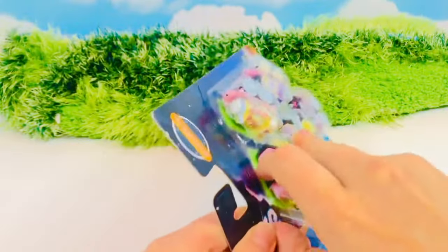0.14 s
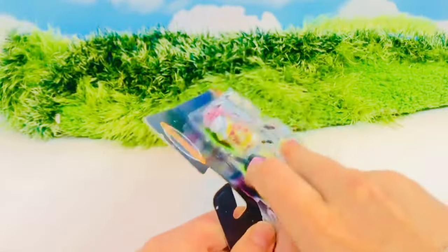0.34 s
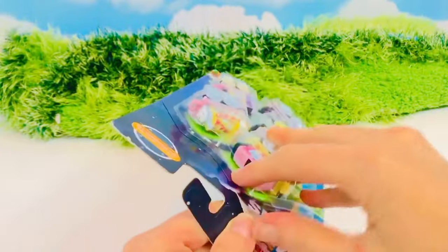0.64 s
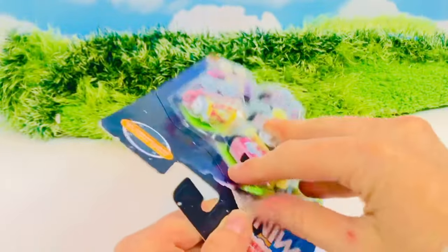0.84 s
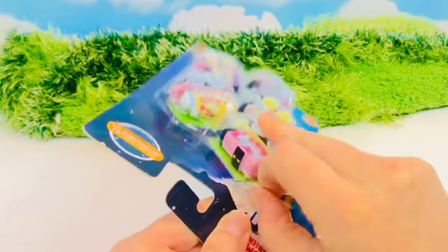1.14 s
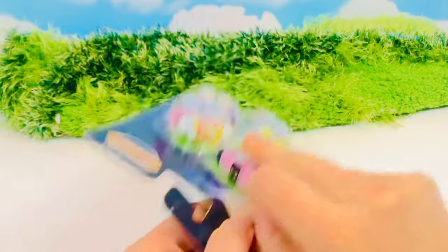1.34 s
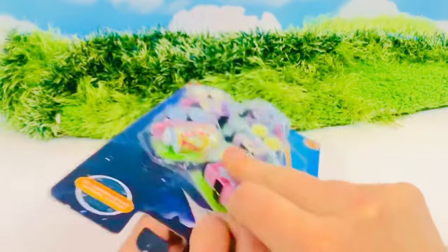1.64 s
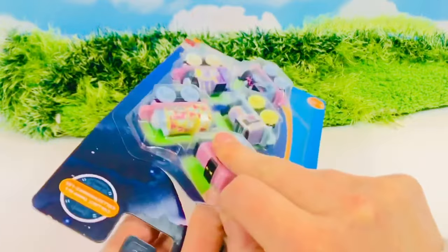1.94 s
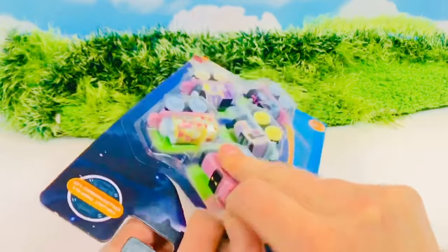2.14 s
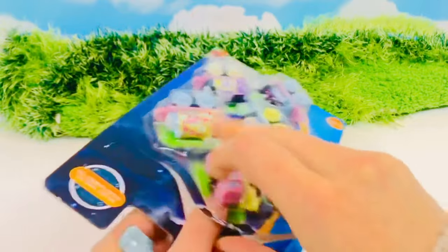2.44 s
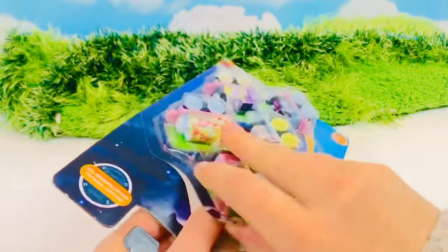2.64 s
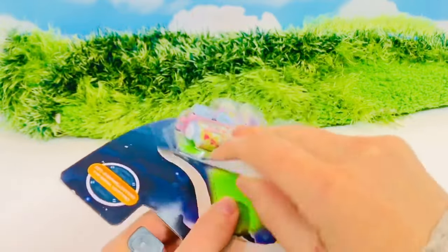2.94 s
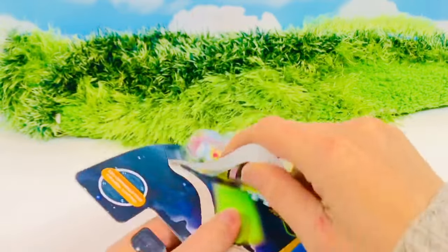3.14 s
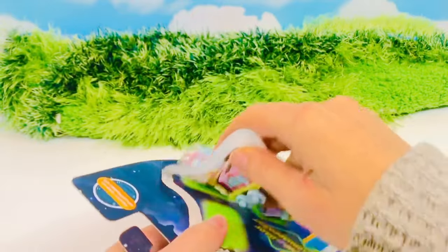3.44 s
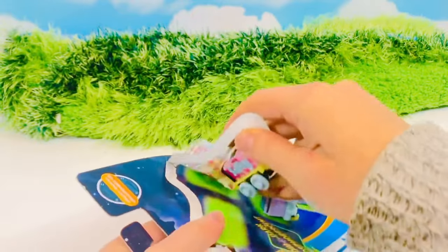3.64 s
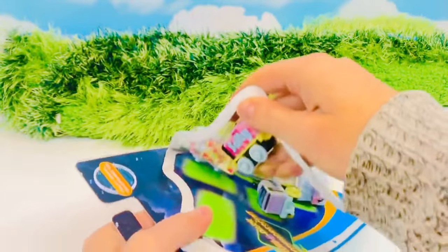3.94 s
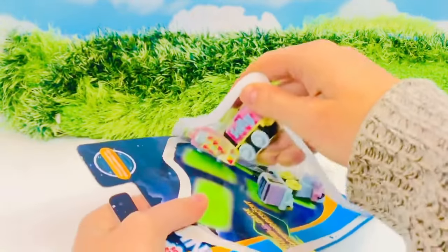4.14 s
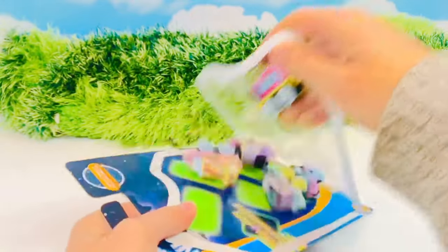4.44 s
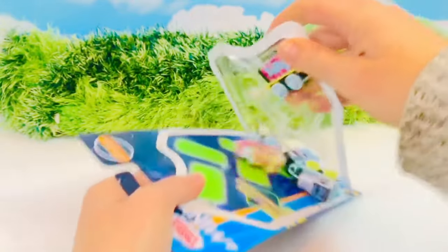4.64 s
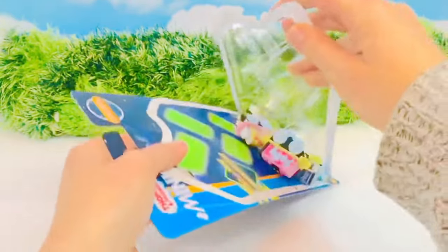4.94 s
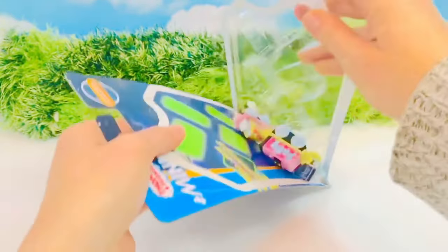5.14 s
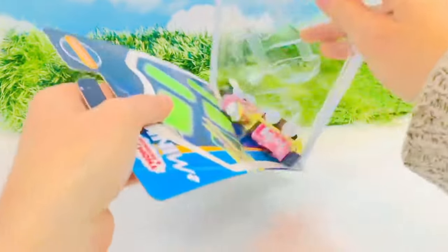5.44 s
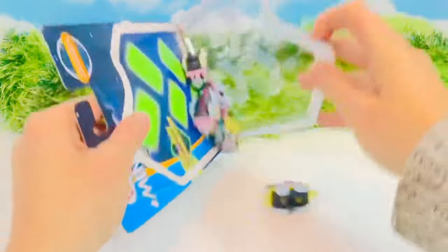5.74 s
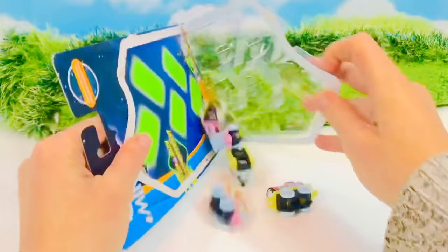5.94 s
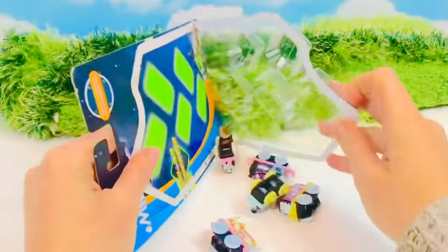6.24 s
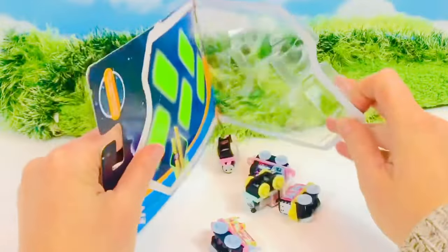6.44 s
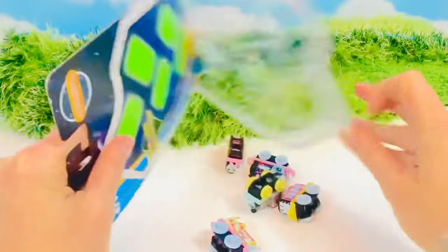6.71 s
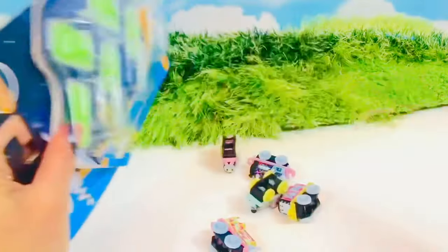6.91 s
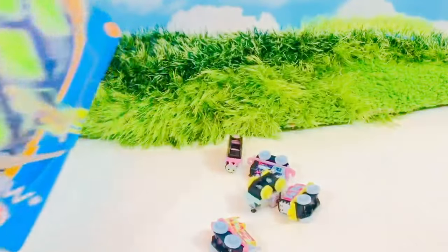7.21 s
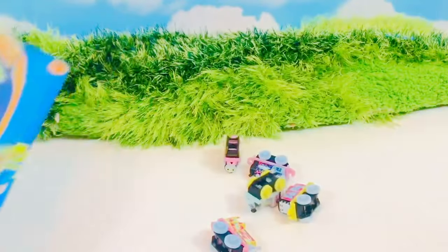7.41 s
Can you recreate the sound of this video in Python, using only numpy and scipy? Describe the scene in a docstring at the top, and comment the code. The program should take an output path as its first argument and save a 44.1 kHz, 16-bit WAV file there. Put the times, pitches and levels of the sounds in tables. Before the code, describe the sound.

Close-up plastic peeling: crinkles, one explosive early snap, a quick tearing burst, rattling little toys, and a final hollow pop of the empty shell.

```python
"""Fine crackle and sharp plastic snaps, close to the microphone: a blister shell is peeled off its card.
The glue seam rips in tiny slips, the shell buckles, small toys skid out and clatter onto the table,
and the empty shell springs back against the card. Each blow is a noise burst or damped resonances;
rubbing is a train of random clicks through the spectrum of what it touches.
The table top adds an early echo, the small damped room a short tail, and faint hiss and rumble lie below."""
import sys
import numpy as np
from scipy import signal
from scipy.fft import rfft, irfft
from scipy.io import wavfile
from scipy.ndimage import uniform_filter1d

SR = 44100
rng = np.random.default_rng(int(sys.argv[2]) if len(sys.argv) > 2 else 0)


def wav_out(sig):
    """Save sig, one row per channel (or a flat mono array), as 16-bit PCM at SR to the path in sys.argv[1]."""
    wavfile.write(sys.argv[1], SR, np.round(np.clip(np.atleast_2d(sig).T, -1, 1) * 32767).astype(np.int16))


N = 333967
TIME = np.arange(N) / SR
HIT_TIME = TIME[:SR // 8]
STROKE_TIME = TIME[:SR // 2]

# Levels in the event and resonance tables are relative; each source sets its own trim.
# pulls on the glue seam, each building until the glue gives:
# [start t/s, length t/s, crackle level/dB, shell level/dB]
PULLS = [(0.18, 0.082, -53, -68), (0.268, 0.035, -42.5, -76), (0.336, 0.027, -31, -43),
         (0.381, 0.0054, -15, -25.5), (0.85, 0.051, -45.5, -78), (0.972, 0.013, -43.5, -46.5),
         (1.05, 0.13, -45.5, -77), (1.26, 0.11, -41, -51.5), (1.41, 0.3, -31, -47), (1.76, 0.066, -42, -42),
         (1.86, 0.036, -44, -43), (2.163, 0.047, -29, -46.5), (2.405, 0.031, -48, -40),
         (2.6, 0.053, -35.5, -62), (2.732, 0.05, -33, -51.5), (2.83, .12, -36, -54),
         (3.0, 0.16, -34.5, -49), (3.18, 0.1, -38.5, -59), (3.3, 0.082, -40, -52.5), (3.65, 0.18, -36, -49),
         (3.865, 0.027, -42, -43.5), (3.97, 0.066, -50, -58), (4.048, 0.032, -33, -42.5),
         (6.69, .04, -38, -49)]
# the last length of seam giving way in a few jerks:
# [start t/s, length t/s, crackle level/dB, shell level/dB]
JERKS = [(4.31, 0.032, -41.5, -51.5), (4.341, 0.027, -29.5, -38), (4.373, 0.0071, -18, -27.5),
         (4.399, 0.047, -22.5, -27.5), (4.453, .038, -29.5, -27), (4.51, 0.052, -38, -36.5)]
# sharp snaps: the shell buckling or slapping the card, or the glue letting go at once: # [t/s, crack level/dB,
# crack length t/s, shell level/dB, thump level/dB, strongest ring f/Hz]
SNAPS = [(0.3887, 8, 0.0044, -15, -49, 680), (1.735, -17.5, 0.0032, -55, -55, 540),
         (1.81, -30, .007, -42, -43, 850), (2.18, -20.5, .012, -46, -50, 577),
         (2.391, -16, 0.014, -52, -62, 610), (2.453, -16.5, 0.0067, -43.5, -47, 625),
         (2.727, -19, 0.01, -60, -73, 1100), (3.1315, -20, 0.012, -34, -70, 1100),
         (3.1418, -16.5, 0.021, -28, -39.5, 1080), (3.284, -16, 0.0098, -44.5, -44.5, 880),
         (3.398, 3.5, .0044, -17.5, -36, 1460), (3.4453, -3, .013, -22, -26.5, 960),
         (3.497, -13, 0.0096, -48, -59, 1100), (3.8862, -15, 0.0039, -39, -47, 1390),
         (4.131, -20, 0.003, -48.5, -55, 1400), (4.378, -4, 0.012, -33, -42, 1030),
         (4.4365, 0.5, 0.01, -42, -33.5, 1130), (4.475, -3, 0.015, -22.5, -50, 1140),
         (6.7915, -5.5, .004, -16, -28.5, 860), (6.9205, -26.5, .005, -41.5, -47, 1300)]
# toys knocking on the pack, the table and each other:
# [t/s, click level/dB, body level/dB, thump level/dB, strongest ring f/Hz]
KNOCKS = [(4.649, -19, -37, -53, 1000), (4.681, -5.5, -36, -47, 1130), (4.82, 1.5, -19.5, -46, 950),
          (4.8334, -2.5, -26, -42.5, 990), (4.8817, 1, -33, -52, 1030), (4.896, -3.5, -41, -58, 960),
          (4.9346, -15, -35, -50, 637), (5.469, -19.5, -39, -67, 1010), (5.481, -23, -41, -75, 1020),
          (5.5817, -22.5, -40.5, -43, 1120), (5.6135, 6, -16.5, -24.5, 665), (5.6779, 3.5, -32, -33, 616),
          (5.7339, 1.5, -31, -36.5, 630), (5.7674, -4.5, -33.5, -44, 785), (5.8101, 1, -18.5, -37, 677),
          (5.816, 5, -30, -48, 1600), (5.826, 3, -22.5, -31, 1220), (5.8533, 4, -28, -42, 1110),
          (5.872, -5, -20, -29.5, 980), (5.914, 5.5, -21, -38, 634), (5.9631, 4.5, -24.5, -37.5, 1050),
          (6.0083, -4.5, -26.5, -32, 664), (6.0297, -3.5, -18, -55, 1170), (6.061, -7, -30.5, -53, 715),
          (6.0803, -10.5, -25.5, -39.5, 711), (6.13, -16, -27, -44, 662), (6.1491, -3, -44, -45, 659)]
# toys skidding over the card: [start t/s, length t/s, hiss level/dB, card level/dB]
SLIDES = [(4.58, 0.12, -43, -45), (4.645, 0.02, -39, -34), (4.72, 0.1, -46, -43),
          (4.825, 0.026, -36, -31.5), (4.9, 0.027, -39.5, -39.5), (5.055, 0.028, -50.5, -57.5),
          (5.27, 0.042, -55, -51.5), (5.395, 0.13, -55, -49), (5.69, 0.12, -35, -38.5),
          (5.815, 0.1, -36.5, -29), (5.955, 0.035, -26.5, -32), (6.035, 0.11, -32.5, -38),
          (6.22, 0.073, -60, -54.5), (6.32, 0.15, -56, -62.5)]
# dull taps and creaks of the pack in the fingers: [t/s, level/dB, strongest ring f/Hz]
TAPS = [(0.626, -33.5, 1150), (1.577, -28, 597), (1.623, -25.5, 630), (1.689, -33, 570),
        (3.0853, -24.5, 910), (3.973, -26.5, 770), (4.157, -26, 880), (4.254, -32.5, 1370),
        (5.324, -33.5, 630), (6.737, -20, 584), (7.125, -42, 690), (7.277, -38.5, 662)]
# fingers shifting their grip on the film: [start t/s, end t/s, level/dB]
GRIPS = [(0.0, .33, -34.5), (1.248, 1.95, -31.5), (2.248, 4.247, -31.5), (6.527, 6.68, -30.5)]

# resonances of the shell on its card: [f/Hz, width f/Hz, level/dB]
SHELL_MODES = [(540, 10, -10), (662, 14, 3), (722, 11, 1.5), (933, 8.9, 1), (1030, 25, -1.5),
               (1158, 24, -1), (1290, 18, -7), (1470, 25, -5), (1600, 12, -17), (2060, 68, -12),
               (2094, 65, -14.5), (2440, 75, -15), (2860, 70, -12), (3067, 110, -19.5)]
# resonances of the empty shell once peeled free: [f/Hz, width f/Hz, level/dB]
EMPTY_SHELL_MODES = [(570, 20, -2), (770, 30, -3), (860, 25, 0.5), (1018, 25, -3.5), (1090, 25, -8),
                     (1170, 14, 1.5), (1330, 18, -6.5), (1550, 12, -2.5), (1600, 10, -5), (1728, 14, -8.5),
                     (1970, 20, -9.5), (2350, 50, -15), (2950, 50, -14)]
# resonances of toys knocking on the card: [f/Hz, width f/Hz, level/dB]
TOY_MODES = [(460, 200, -20), (674, 6.5, 2.5), (770, 160, 0), (1005, 67, 2), (1154, 80, -15),
             (1220, 17, -0.5), (1390, 110, -8.5), (1660, 34, -4), (1844, 110, -2), (2416, 96, -8.5),
             (2870, 15, -17), (3450, 140, -23)]
# resonances of the card: [f/Hz, width f/Hz, level/dB]
CARD_MODES = [(85.6, 56, -16), (127, 40, -10), (170, 50, 1.5), (302, 66, 2), (413, 34, 3), (572, 42, 7.5)]
# resonances of the table top: [f/Hz, width f/Hz, level/dB]
TABLE_MODES = [(135, 10, -9), (170.5, 11, 5), (220, 110, -20), (306, 15, 0.5), (380, 22, 1.5),
               (532, 21, -8.5)]

# Only the shape of these spectra counts.
# ripping glue and fibres: [f/Hz, level/dB per Hz]
RIP_SPECTRUM = [(2000, -17), (3000, -14), (4400, -13), (6000, -9), (7400, -4), (9500, -3), (11500, -2),
                (13000, 2), (14500, 5), (15800, 4)]
# shell flexing behind the pulls: [f/Hz, level/dB per Hz]
FLEX_SPECTRUM = [(150, -11.5), (250, -35), (330, -10), (500, -4), (650, -2.5), (850, -5), (1100, -4),
                 (1600, -14), (2400, -20), (4000, -28.5), (9000, -73.5)]
# freed shell radiating the tear: [f/Hz, level/dB per Hz]
SEAM_SPECTRUM = [(110, -28), (170, -12.5), (250, -26), (330, -15.5), (470, -5.5), (780, -11), (970, 2),
                 (1140, -2.5), (1460, -6), (2000, -12), (2800, -16), (4000, -20), (9000, -50)]
# crack of the buckling shell: [f/Hz, level/dB per Hz]
CRACK_SPECTRUM = [(1500, -13), (2200, -12), (3200, -9.5), (4500, -12), (5800, -5.5), (9000, -5.5),
                  (11000, -1), (13000, -1), (15800, -7)]
# click of a hard toy: [f/Hz, level/dB per Hz]
CLICK_SPECTRUM = [(1700, -15), (2900, -12), (3300, -11), (4500, -14), (5800, -11), (7000, -5), (7600, -6),
                  (8300, -1), (9000, -5), (9700, -3), (11500, -6), (13000, -4), (14500, -3), (15800, -3)]
# card rubbed by sliding toys: [f/Hz, level/dB per Hz]
RUB_SPECTRUM = [(150, -76), (250, -47), (471, -8.5), (523, 1), (768, -3.5), (976, 6.5), (1330, -2),
                (1560, -6), (1900, -15.5), (2700, -18), (3000, -21), (3900, -44), (6600, -120)]
# background hiss and rumble: [f/Hz, level/dB per Hz]
FLOOR_SPECTRUM = [(12, -37), (20, 2.5), (79, -2), (168, 0), (328, -3.5), (499, -4), (642, -3.5),
                  (825, -9.5), (1150, -8.5), (1710, -14.5), (4540, -19), (14300, -17), (16000, -35.5)]
# room decay by 60 dB: [f/Hz, t/s]
ROOM_T60 = [(150, .28), (700, .27), (1500, .28), (4000, .24), (9000, .22), (15000, .19)]
# room against the direct sound: [f/Hz, level/dB]
ROOM_LEVEL = [(150, 1.5), (700, -3.5), (1500, -1), (4000, 0), (9000, -5.5), (15000, -6)]

SHELL_FREE_S = 6.3
# extra width of the resonances in a snap, on the card and once free
HELD_DAMPING_HZ, FREE_DAMPING_HZ = 75, 45
FLAP_FROM_S, FLAP_TO_S = 3.885, 4.35
FLAP_HZ, FLAP_WIDTH_HZ, FLAP_DB = 1400, 40, -63
FLOOR_DB, CUTOFF_HZ = -58, 15800


def peeling(trim_db=-2):
    """Glue and paper fibres let go a few at a time."""
    fibres = slips(per_s=1500, spread_db=0.5, clump_db=2.0, clump_per_s=200)
    pull = stroke_gains(PULLS, attack_s=0.011, swell_db_per_s=53, release_s=0.013)
    return from_db(trim_db) * friction(pull, fibres, RIP_SPECTRUM, FLEX_SPECTRUM)


def tearing():
    """The seam runs: dense slips in quick jerks, and the freed shell radiates them."""
    fibres = slips(per_s=4000, spread_db=3.3, clump_db=3, clump_per_s=260)
    jerk = stroke_gains(JERKS, attack_s=0.0035, swell_db_per_s=30, release_s=0.013)
    return friction(jerk, fibres, RIP_SPECTRUM, SEAM_SPECTRUM)


def shell_snaps(crack_trim_db=3, shell_trim_db=27, thump_trim_db=24, brighten_db=2.5):
    """The shell flips through a buckle or the glue lets go at once: a crack, a hollow ring and a card thump;
    higher rings are brighter."""
    out = np.zeros(N)
    for s, crack_db, length_s, shell_db, thump_db, hz in SNAPS:
        modes, damping_hz = SHELL_MODES, HELD_DAMPING_HZ
        if s >= SHELL_FREE_S:
            modes, damping_hz = EMPTY_SHELL_MODES, FREE_DAMPING_HZ
        tilt_db = 1.1 + brighten_db * np.log2(hz / 1000)
        snap = crack(CRACK_SPECTRUM, length_s)
        hollow = ring(modes, damping_hz, low_cut_hz=710, focus_hz=hz, focus_db=5.5, tilt_db=tilt_db)
        thump = ring(CARD_MODES, damping_hz=18, low_cut_hz=72)
        add(out, s, from_db(crack_db + crack_trim_db) * snap)
        add(out, s, from_db(shell_db + shell_trim_db) * hollow)
        add(out, s, from_db(thump_db + thump_trim_db) * thump)
    return out


def toy_knocks(click_trim_db=4, body_trim_db=27, thump_trim_db=26):
    """Hard little toys land: a bright click, a short knock and the boom of the table top."""
    out = np.zeros(N)
    for s, click_db, body_db, thump_db, hz in KNOCKS:
        click = crack(CLICK_SPECTRUM, length_s=0.0064)
        body = ring(TOY_MODES, damping_hz=48.3, low_cut_hz=480, focus_hz=hz, focus_db=12, scatter_db=6.5)
        boom = ring(TABLE_MODES, damping_hz=9.9, low_cut_hz=210, scatter_db=0.5)
        add(out, s, from_db(click_db + click_trim_db) * click)
        add(out, s, from_db(body_db + body_trim_db) * body)
        add(out, s, from_db(thump_db + thump_trim_db) * boom)
    return out


def sliding(trim_db=-0.5):
    """Toys skid and chatter down the tilted card."""
    chatter = slips(per_s=900, spread_db=-3.5, clump_db=3.0, clump_per_s=270)
    skid = stroke_gains(SLIDES, attack_s=0.007, swell_db_per_s=37.5, release_s=0.022)
    return from_db(trim_db) * friction(skid, chatter, CLICK_SPECTRUM, RUB_SPECTRUM)


def finger_taps(trim_db=11):
    """Soft fingertips wake mostly the shell modes near one pitch, without a crack."""
    out = np.zeros(N)
    for s, db, hz in TAPS:
        tap = ring(SHELL_MODES, damping_hz=60, low_cut_hz=170, focus_hz=hz, focus_db=10, scatter_db=0.3)
        add(out, s, from_db(db + trim_db) * tap)
    return out


def crinkling(ticks_per_s=18, spread_db=4, tick_trim_db=2, creak_trim_db=-2, rub_trim_db=-24):
    """Fingers rub the film, and small dents pop in and out, each a tick with a short creak of the shell."""
    out, rub = np.zeros((2, N))
    for start_s, end_s, db in GRIPS:
        rub += from_db(db + rub_trim_db) * ((TIME > start_s) & (TIME < end_s))
        slots = np.arange(start_s, end_s, 1 / ticks_per_s)
        chances = rng.random((len(slots), 4))
        for s, (late, tick_chance, creak_chance, pitch) in zip(slots, chances):
            tick_db = tick_trim_db + spread_db * (2 * tick_chance + 0.5)
            creak_db = creak_trim_db + spread_db * 2 * creak_chance
            tick = crack(RIP_SPECTRUM, length_s=0.003)
            creak_hz = 560 * 2 ** pitch  # anywhere within one octave
            creak = ring(SHELL_MODES, damping_hz=60, low_cut_hz=350, focus_hz=creak_hz, focus_db=12)
            pop = from_db(tick_db) * tick + from_db(creak_db) * creak
            add(out, s + late / ticks_per_s, from_db(db) * pop)
    film = slips(per_s=2300, spread_db=1, clump_db=15, clump_per_s=40)
    return out + through(rub * film, response(RIP_SPECTRUM))


def flap():
    """Faint slips at the hinge keep one mode of the lifted flap ringing while it is bent back."""
    bent = (TIME > FLAP_FROM_S) & (TIME < FLAP_TO_S)
    decay = np.exp(-np.pi * FLAP_WIDTH_HZ * HIT_TIME)
    mode = unit_energy(decay * np.sin(2 * np.pi * FLAP_HZ * HIT_TIME))
    hinge = slips(per_s=300, spread_db=2, clump_db=3, clump_per_s=60)
    return from_db(FLAP_DB) * through(bent * hinge, mode)


def blows():
    """All snaps, taps and knocks radiated in one direction, each call with its own fine detail."""
    return shell_snaps() + finger_taps() + toy_knocks()


def table_echo(direct, echo_db=-8, delay_s=0.003648):
    """The table top throws the sound back; the hands shade off its treble."""
    shaded = uniform_filter1d(direct, size=8)
    return from_db(echo_db) * np.interp(TIME - delay_s, TIME, shaded, left=0)


def room_tail(gap_s=0.00059):
    """Diffuse reverberation of one click: noise bands with their own decay; the treble dies first."""
    t = STROKE_TIME
    edges = np.geomspace(60, 18000, num=13)
    noises = rng.standard_normal((2, len(t)))  # alternate, so neighbouring bands differ
    onset = np.clip(t / gap_s - 0.5, 0, 1)
    tail = np.zeros(len(t))
    for k, (low, high) in enumerate(zip(edges, edges[1:])):
        hz = np.sqrt(low * high)
        band_pass = signal.butter(2, [low, high], "band", fs=SR, output="sos")
        band = signal.sosfilt(band_pass, noises[k % 2])
        fade = onset * np.exp(-np.log(1000) * t / at_hz(ROOM_T60, hz))
        share = np.sqrt(2 * (high - low) / SR)  # the band's part of a click's flat spectrum
        tail += unit_energy(band * fade) * share * from_db(at_hz(ROOM_LEVEL, hz))
    return tail


def room_sound(rubbing, sides=4):
    """The room hears the pack from several sides, each with its own blows and its own tail."""
    heard = sum(through(blows() + rubbing, room_tail()) for side in range(sides))
    return heard / np.sqrt(sides)


def noise_floor():
    """Steady faint hiss and rumble: noise shaped by a spectrum."""
    return from_db(FLOOR_DB) * through(rng.standard_normal(N), response(FLOOR_SPECTRUM))


def friction(gains, clicks, bright, hollow, facets=10, touch_s=0.004):
    """Slips crackle on one random facet after another and shake the body behind them."""
    crackle, body = gains
    touched = rng.integers(0, facets, N)[(TIME / touch_s).astype(int)]
    fizz = np.zeros(N)
    for k in range(facets):
        fizz += through(clicks * crackle * (touched == k), response(bright, uneven_db=3.5))
    return fizz + through(clicks * body, response(hollow))


def slips(per_s, spread_db, clump_db, clump_per_s):
    """Stick-slip clicks of random size and sign, louder and softer in clumps; local rms held near one."""
    size_db = spread_db * np.minimum(rng.exponential(1, N), 4) + clump_db * drift(clump_per_s)
    slipping = rng.random(N) < per_s / SR
    clicks = from_db(size_db) * rng.choice([-1, 1], N) * slipping
    power = np.abs(uniform_filter1d(clicks ** 2, size=1500))
    return clicks / np.sqrt(power + 1e-9)


def stroke_gains(strokes, attack_s, swell_db_per_s, release_s):
    """Each stroke catches quickly, swells as force builds and dies on letting go; gains of crackle and body."""
    gains = np.zeros((2, N))
    for start_s, length_s, *levels in strokes:
        since_end = STROKE_TIME - length_s
        attack = np.minimum(STROKE_TIME / attack_s, 1)
        swell = from_db(swell_db_per_s * np.minimum(since_end, 0))
        release = np.exp(-np.maximum(since_end, 0) / release_s)
        for gain, db in zip(gains, levels):
            add(gain, start_s, from_db(db) * attack * swell * release)
    return gains


def crack(spectrum, length_s, edge=0.18, edge_s=0.00043):
    """A hard leading edge, then a run of tiny impacts on one facet that stops within milliseconds."""
    envelope = edge * np.exp(-HIT_TIME / edge_s) + np.exp(-(HIT_TIME / length_s) ** 2)
    impacts = rng.standard_normal(len(HIT_TIME)) * envelope
    return unit_energy(through(impacts, response(spectrum, uneven_db=1.2)))


def ring(modes, damping_hz, low_cut_hz, focus_hz=1000, focus_db=0, tilt_db=0, scatter_db=1.0):
    """One blow: contact favours modes near focus_hz, tilt_db per octave the high ones; damping widens all."""
    hz, width_hz, db = np.transpose(modes)[:, :, None]
    nearness = np.exp(-(4 * np.log(hz / focus_hz)) ** 2)
    scatter = scatter_db * rng.standard_normal(hz.shape)
    db = db + focus_db * nearness + tilt_db * np.log2(hz / focus_hz) + scatter
    width_hz = width_hz + damping_hz
    strength = from_db(db) * np.sqrt(width_hz) * rng.choice([-1, 1], hz.shape)
    # bending waves take up to a millisecond to cross the sheet
    age = np.maximum(HIT_TIME - 0.001005 * rng.random(hz.shape), 0)
    decay = np.exp(-np.pi * width_hz * age)
    rings = np.sum(strength * decay * np.sin(2 * np.pi * hz * age), axis=0)
    # the contact bounces once, a few milliseconds later
    bounce_s = rng.uniform(0.001902, 0.005214)
    rings = rings + 0.33 * np.interp(HIT_TIME - bounce_s, HIT_TIME, rings, left=0)
    low_cut = signal.butter(2, low_cut_hz, "high", fs=SR, output="sos")
    return unit_energy(signal.sosfilt(low_cut, rings))


def response(spectrum, uneven_db=0, size=4096):
    """Causal impulse response of a spectrum; uneven_db adds the chance peaks and dips of one small facet."""
    hz = np.maximum(np.arange(size // 2 + 1) * SR / size, 1)
    facet_hz = np.arange(0, SR / 2, 700)
    facet = np.interp(hz, facet_hz, rng.standard_normal(len(facet_hz)))
    low_fall = np.minimum(hz / spectrum[0][0], 1) ** 2  # below the first point
    gain = from_db(at_hz(spectrum, hz) + uneven_db * facet) * low_fall
    cepstrum = irfft(np.log(gain + 1e-6))
    cepstrum[1:size // 2] *= 2  # folding the cepstrum gives minimum phase
    cepstrum[size // 2 + 1:] = 0
    return unit_energy(irfft(np.exp(rfft(cepstrum))))


def through(x, impulse):
    """Pass a sound through an impulse response."""
    return signal.oaconvolve(x, impulse)[:len(x)]


def drift(per_s):
    """Random values per_s times a second, joined by straight lines, with an rms of one."""
    return rms_one(np.interp(TIME * per_s, np.arange(N), rng.standard_normal(N)))


def at_hz(points, hz):
    """Read a table along a log-frequency axis."""
    freqs, values = np.transpose(points)
    return np.interp(np.log(np.maximum(hz, 1)), np.log(freqs), values)


def add(out, s, sound):
    """Mix a sound in at time s."""
    start = max(round(s * SR), 0)
    out[start:start + len(sound)] += sound[:N - start]


def from_db(db):
    """Decibels to gain."""
    return 10 ** (np.asarray(db) / 20)


def unit_energy(x):
    """Scale to a summed square of one."""
    return x / np.sqrt(np.sum(x ** 2) + 1e-20)


def rms_one(x):
    """Scale to a mean square of one."""
    return unit_energy(x) * np.sqrt(len(x))


def scene():
    """The close microphone hears one side of the pack, then the table echo, the room and the noise floor."""
    rubbing = peeling() + tearing() + sliding() + crinkling() + flap()
    direct = blows() + rubbing
    return (direct + table_echo(direct) + room_sound(rubbing) + noise_floor())[None]


def record(dry):
    """The recorder clips peaks beyond full scale; a steep low-pass cuts the top."""
    low_pass = signal.ellip(10, 0.2, 70, CUTOFF_HZ, fs=SR, output="sos")
    return signal.sosfilt(low_pass, np.clip(dry, -1, 1))


dry = scene()
out = record(dry)
wav_out(out)
```